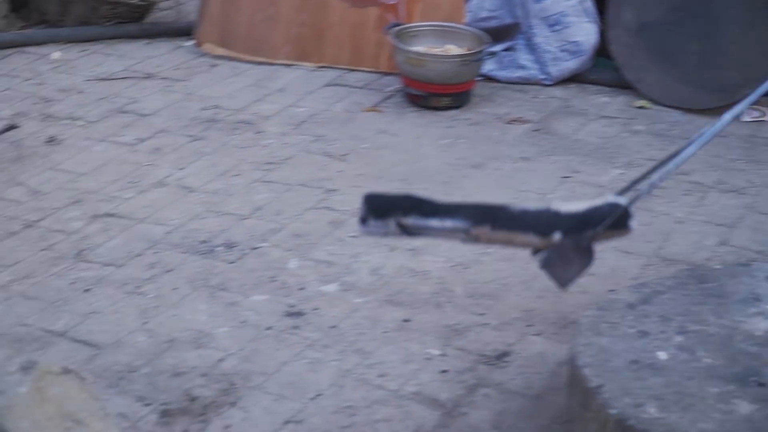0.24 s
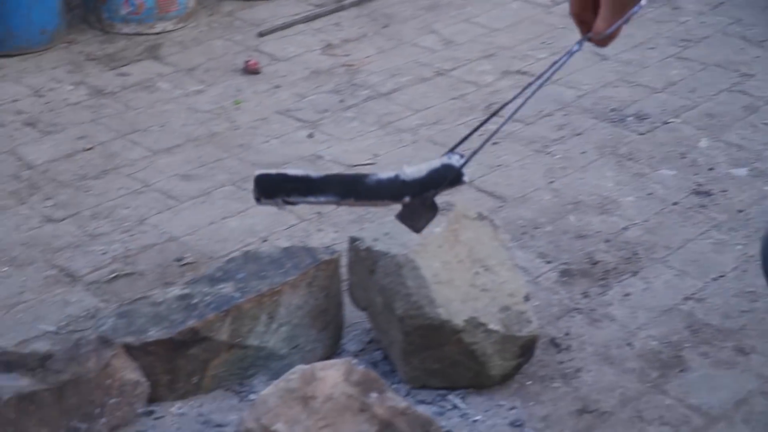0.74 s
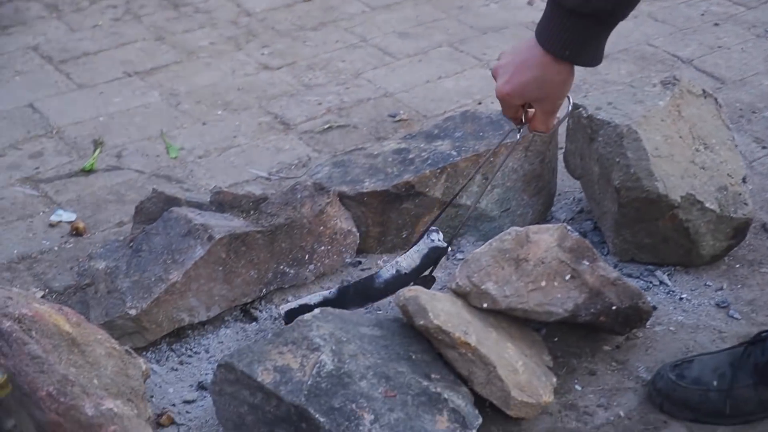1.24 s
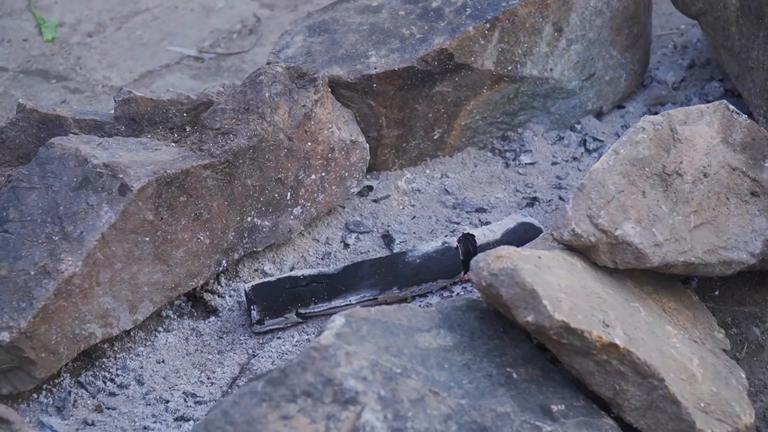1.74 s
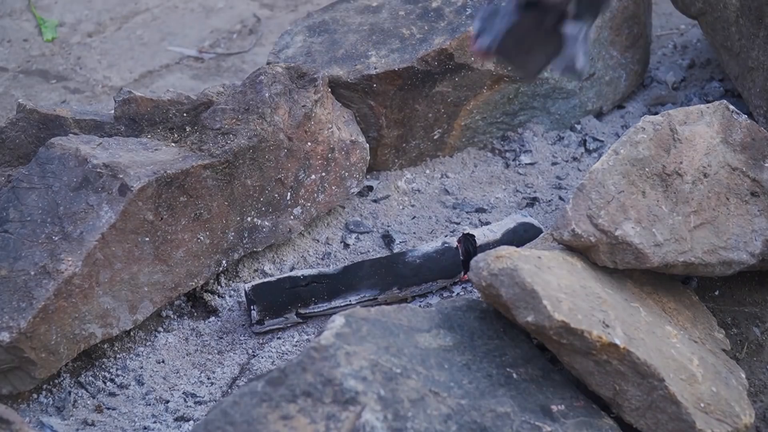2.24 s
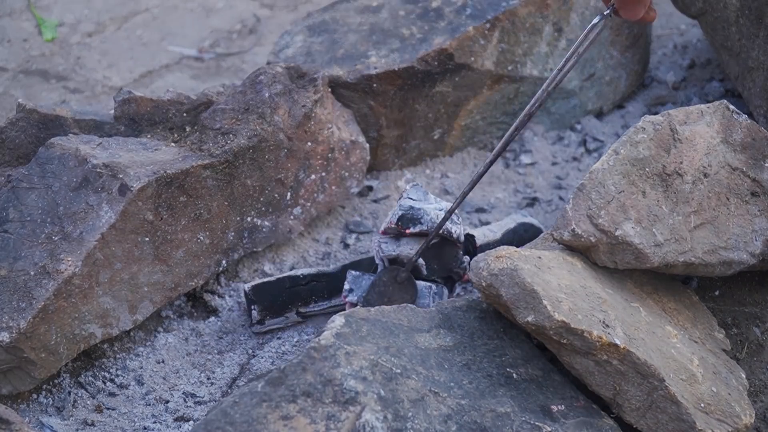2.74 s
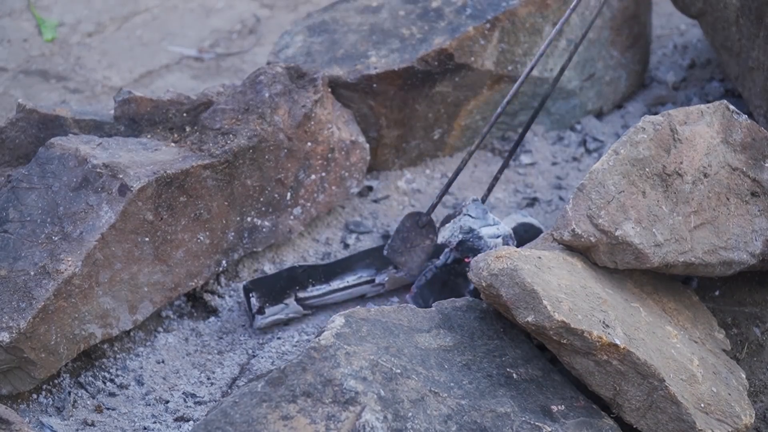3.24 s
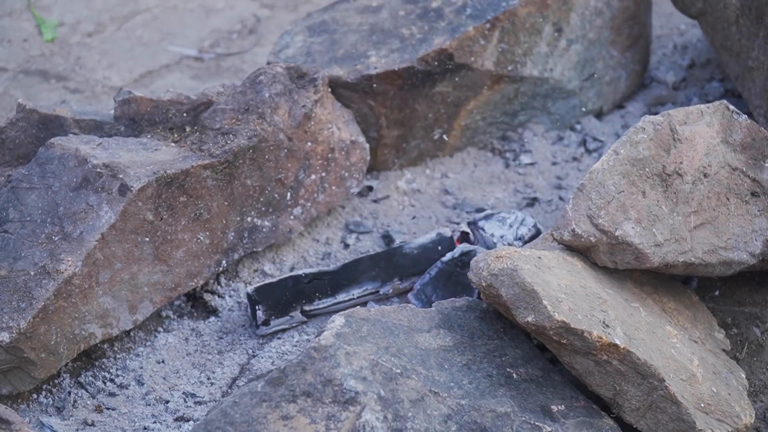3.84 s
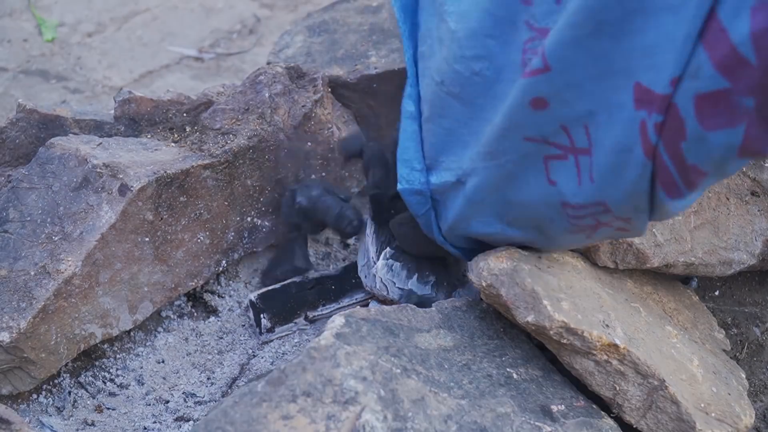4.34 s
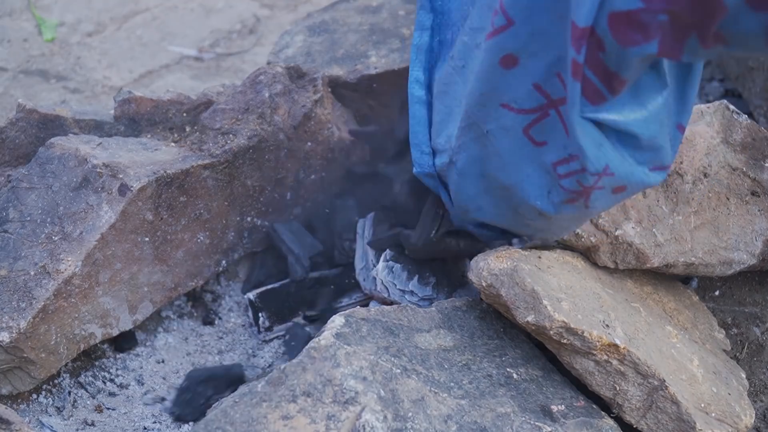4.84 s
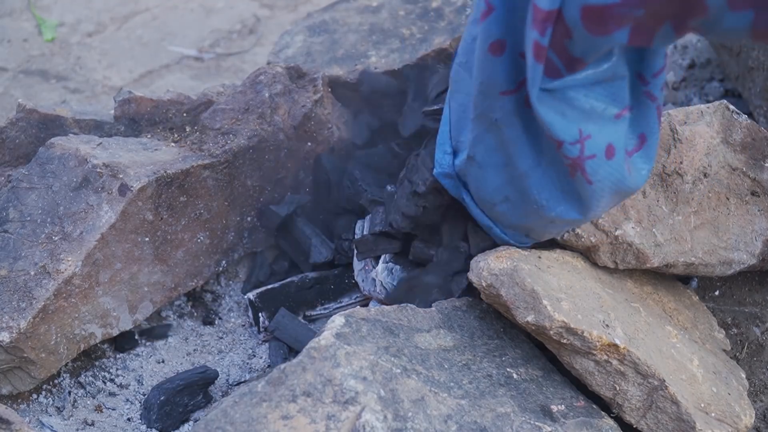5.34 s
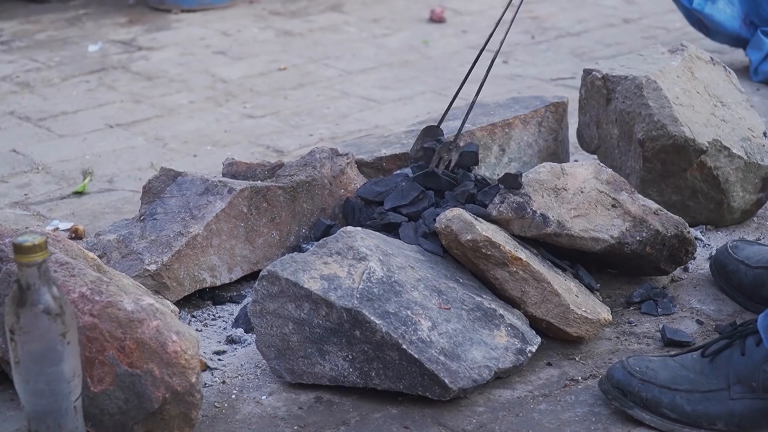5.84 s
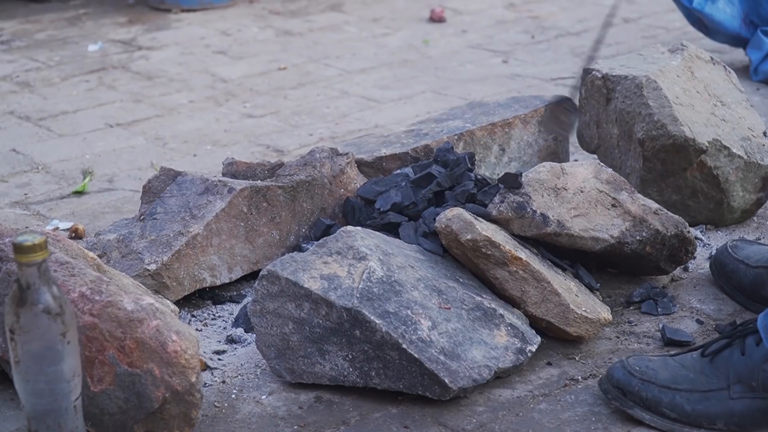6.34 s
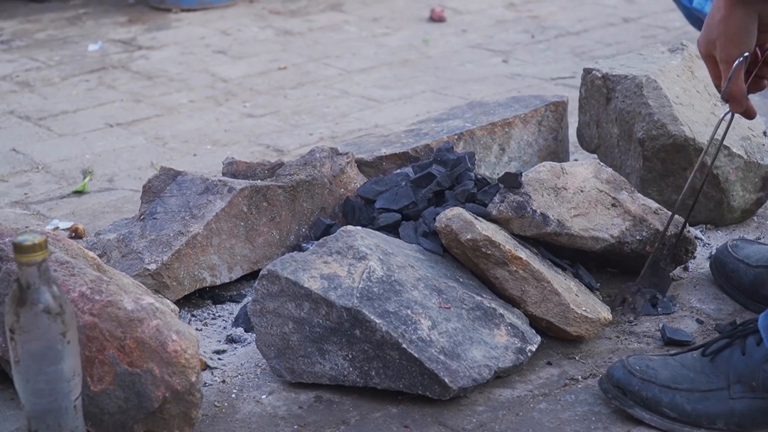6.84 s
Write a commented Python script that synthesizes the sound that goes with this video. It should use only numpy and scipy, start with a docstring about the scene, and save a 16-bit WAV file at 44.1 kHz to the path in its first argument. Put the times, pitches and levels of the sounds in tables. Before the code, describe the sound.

Embers pop and hiss, metal tongs tap, then a sack thumps and charcoal pours in a loud clattering rush that stops dead before quieter poking.

```python
"""A charcoal fire in a ring of stones on a paved yard, close to one microphone, with gusts of wind on it.
At first embers pop (noise bursts through sharp filters) over a faint far whine; tongs tap, the embers hiss.
Then lumps knock (short damped rings), a sack thumps down (dull modes), and charcoal pours out (a hail of hits).
The pour is cut off abruptly, the yard air switches colour and the sizzle drops in level; the tongs stir
the heap (tiny slips), one loud pop goes off, and the tongs tap on stone (contacts that ring the steel modes)."""
import sys
import numpy as np
from scipy import signal
from scipy.fft import rfft, irfft, next_fast_len
from scipy.io import wavfile
from scipy.ndimage import uniform_filter1d, map_coordinates

SR = 44100
rng = np.random.default_rng(int(sys.argv[2]) if len(sys.argv) > 2 else 0)


def digitize_waveform(pressure):
    """Quantize a signal to 16-bit integers and store it at the path in sys.argv[1].

    Rows of a 2-D input are taken as channels; values are limited to [-1, 1].
    """
    field = np.atleast_2d(pressure).T
    bounded = np.clip(field, -1, 1)
    quanta = np.round(bounded * 32767).astype(np.int16)
    wavfile.write(sys.argv[1], SR, quanta)


N = 312669  # about 7.09 s

# All levels are relative: the layers are scaled again where they are mixed.
# Ember pops close to the microphone:
# (time [s], level [dB], brightness [dB per octave], highest pitch [Hz], crumbling t60 [s])
EMBER_POPS = [(0.043, 28.5, -2.5, 650, 0.06), (0.0494, 16.5, -1.5, 4630, 0.068),
              (0.3, 3.5, -2, 4430, 0.038), (0.5735, 5.5, -6, 800, .038), (0.661, 8.5, -6, 12000, 0.17),
              (0.738, 10.5, -2.5, 4500, 0.027), (0.948, 18.5, -5.5, 780, 0.068), (0.957, 6, -2, 8000, 0.11),
              (0.994, 20.5, -3, 2670, 0.02), (1.11, 2.5, -3.5, 9000, 0.33), (1.149, 16, -1.5, 1680, 0.0083),
              (1.166, 3.5, -2, 4480, 0.0096), (1.1963, 9, -4.5, 2500, .058),
              (1.21, 18.5, -4.5, 10900, 0.011), (1.347, -3.5, -.5, 9500, 0.013),
              (1.49, 7.5, -5, 1840, 0.03), (1.556, 4.5, -4.5, 14000, 0.034), (1.597, 5.5, -4, 9000, 0.038),
              (1.887, -1.5, -7.5, 1000, 0.046), (1.9616, 14, -2, 2000, 0.033),
              (1.9669, 15, -5, 1900, 0.017), (2.287, 9.5, -7.5, 990, 0.075), (2.3318, 14, -5.5, 1920, .027),
              (2.4595, -6.5, 0, 14000, 0.035), (3.648, 0.5, 3, 5200, 0.013),
              (6.199, 25.5, -1.5, 3930, 0.012)]
POP_HZ = np.geomspace(200, 16000, 20)  # pitches at which a pop's colour is set
POP_PIVOT_HZ, CLIFF_DB = 780, 17.5  # brightness tilts about this pitch; fall per octave above the highest pitch
BOOM_HZ, BOOM_T60_S, BOOM_DB = 213, 0.088, -54.5  # a low note lingers after each pop, in step with its bass
# scattered tail before and after the cut, when the microphone stands farther off
TAIL_DB, TAIL_LATE_DB = -11.5, -5

# Charcoal lumps knocking together:
# (time [s], level [dB], brightness [dB per octave], ring pitch [Hz], ring level [dB])
LUMP_KNOCKS = [(2.705, -0.5, -2, 7130, -23), (2.792, 0, 1, 3500, -19), (3.0209, 18, -6, 3230, -10),
               (3.037, 1, -5, 3280, -23), (3.0645, 9, -5, 2910, -13.5), (3.4202, 1, -2, 1075, -16.5),
               (3.4695, 0, -0.5, 3060, -35), (3.484, 5, -4.5, 1900, -28), (3.835, 0, -6, 2060, -29),
               (3.9397, 7, -3, 1950, -7), (3.956, 11, 0.5, 1510, -2.5), (4.064, 6, 1.5, 6000, -4),
               (4.125, 15, -2.5, 3000, -12), (4.207, 8, -3, 2750, 2.5), (4.247, 12, 0.5, 8100, -5),
               (4.332, 17.5, 1, 7160, -1.5), (4.349, 19.5, -1.5, 8330, -5), (4.398, 17.5, -3.5, 3080, -5),
               (4.6, 12, 3, 3340, -12), (4.697, -13, 4, 3640, -2.5), (4.824, 8.5, 5.5, 8490, 5),
               (4.857, -6, 2, 4800, -2), (4.929, 18, -1.5, 3080, -15), (5.134, 14.5, 3.5, 3130, -22.5),
               (5.177, 17.5, -0.5, 2580, -10), (5.213, 12.5, 2, 8400, -5), (5.391, 5, -7.5, 2350, -12.5),
               (5.435, 14, 2.5, 6170, -0.5), (5.96, 0.5, 0, 2830, -16), (5.974, -0.5, 1, 4410, -25),
               (6.007, -7, -1, 6500, -29), (6.3046, -5, 1.5, 2740, -23), (6.3535, -11, 2.5, 2620, -24),
               (6.517, 0.5, -1, 2600, -16), (6.6675, 0, -1, 2490, -23), (6.6892, -2, -1, 4500, -33),
               (6.709, -5.5, -1, 8150, -24)]
# Pitches at which the colour of a hard contact is set: (pitch [Hz])
KNOCK_HZ = [480, 1200, 3500, 9500]
# Colour of every lump knock, at each of KNOCK_HZ: (level [dB])
LUMP_BODY_DB = [-5.5, -3, -1, -10.5]
KNOCK_T60_S, RATTLE_T60_S = 0.016, 0.16  # crumbling of a lone knock; of a poured lump rattling down the heap

# The tongs strike stone: (time [s], force [dB], chatter t60 [s], ring level [dB])
TONG_TAPS = [(1.571, 19.5, 0.055, -23.5), (3.302, -7, 0.14, -32), (6.595, 21.5, .024, -17),
             (6.775, 16.5, 0.022, -24.5), (6.797, -7, 0.04, -30), (6.912, -1, 0.042, -30.5),
             (6.9717, 3.5, 0.049, -51), (7.043, -5, .07, -43)]
# Colour of a light tap, at each of KNOCK_HZ: (level [dB])
TAP_BODY_DB = [-1.5, -3, -6, -10]
# Growth there with force, so that hard taps are sharper: (gain [dB per dB of force])
TAP_GROWTH = [0.091, -0.72, 1, 0.52]
# Modes of the steel arms before the grip damps them: (pitch [Hz], level [dB], t60 [s])
STEEL_MODES = [(1320, -13, 0.094), (2580, -23.5, 0.085), (3240, -3.5, .04), (3610, -9, 0.11),
               (3980, 0, 0.029), (4130, -10, 0.23), (4110, -4.5, 0.055), (5170, -14, 0.12),
               (7540, -19.5, .06), (8000, -3, 0.063), (9000, -23, 0.093), (13120, -15, 0.24),
               (14020, -20, 0.13)]

# The pour: (time [s], flow [dB], thud of heavy lumps [dB], fine dust [dB])
POUR_FLOW = [(3.95, -17, -29.5, -22.5), (4.164, -18, -31, -22), (5.128, -18.5, -34, -20.5),
             (5.63, -27.5, -42, -31)]
POUR_START, CUT = 3.939, 5.639  # s
# Colour of the charcoal landing on the heap: (pitch [Hz], level [dB per Hz])
HEAP_COLOUR = [(35, -45), (60, -22), (103, -14.5), (180, -13.5), (293, -7.5), (456, -4.5), (780, 2.5),
               (919, 2.5), (3020, 3.5), (4490, -1), (5280, -9.5), (8420, -12.5), (9240, -22), (13400, -20),
               (15800, -27)]
CLINKS_PER_S, CLINK_T60_S, CLINK_DB = 29, 0.064, -19.5  # single pieces ringing out of the pour
# Pitches at which the poured pieces ring: (pitch [Hz])
PIECES_HZ = [1970, 2698, 3004, 3400, 4355, 5460, 6068, 6610, 6980, 6880, 8580]

# The full sack lands on the stones: (time [s], level [dB])
SACK_BUMPS = [(3.74, -15.5), (3.758, -22), (3.834, -22), (3.88, -33), (3.921, -26)]
# Dull modes of the sack: (pitch [Hz], level [dB], t60 [s])
SACK_MODES = [(95.5, -13.5, 0.47), (157.4, -4.5, 0.22), (320, -13.5, 0.097), (430, -12, 0.053)]

# Lumps and ash shift and scrape, and the sack rustles from 3.62 to 3.70 s: (start [s], end [s], level [dB])
SCRAPES = [(2.795, 2.864, -35.5), (2.94, 3.02, -40.5), (3.246, 3.367, -41), (3.619, 3.702, -36),
           (5.818, 5.869, -51), (5.96, 6.126, -37.5), (6.105, 6.192, -43), (6.394, 6.451, -49),
           (6.59, 6.74, -44.5), (6.78, 6.945, -49.5)]

HISS_START, HISS_END, HISS_ATTACK_S, HISS_RELEASE_S, HISS_DB = 1.95, 2.47, 0.041, 0.11, -40
# Colour of the embers' hiss: (pitch [Hz], level [dB per Hz])
HISS_COLOUR = [(180, -36), (300, -16), (366, -9), (391, -26), (545, -9.5), (1170, -4.5), (2590, -10.5),
               (6240, -11.5), (15800, -19)]

# Gusts on the microphone: (time [s], level [dB])
GUSTS = [(.1, -31.5), (.57, -33.5), (.85, -29.5), (1.6, -30.5), (2.1, -34), (6.17, -41.5), (6.85, -61)]
GUST_WIDTH_S, CALM_DB = 0.16, -50.5
# Rumble of wind on the microphone: (pitch [Hz], level [dB per Hz])
WIND_COLOUR = [(5, -25), (14, -3), (20, 0), (28, -20), (55, -28), (120, -62), (300, -120)]

# Background before the cut: (time [s], yard air [dB], ember sizzle [dB])
AIR = [(0, -43, -47.5), (1.65, -45, -50.5), (1.9, -45.5, -45.5), (2.6, -47, -51), (3.9, -47.5, -47)]
# Background after the cut: (time [s], yard air [dB], ember sizzle [dB])
AIR_LATE = [(5.65, -48.5, -62), (6.1, -49, -56.5), (7.09, -45, -59.5)]
# Colour of the yard air before the cut: (pitch [Hz], level [dB per Hz])
YARD_COLOUR = [(26, -25), (45, -6), (181, -11.5), (494, -12), (594, -14.5), (1050, -16), (1690, -18),
               (1990, -19), (2440, -23), (2930, -25.5), (6000, -28), (7800, -66), (13200, -120)]
# Colour of the yard air after the cut: (pitch [Hz], level [dB per Hz])
YARD_LATE_COLOUR = [(26, -31), (45, -1.5), (85, -11.5), (335, -17), (514, -18), (1190, -24.5), (1400, -22),
                    (1790, -35), (6000, -37.5), (7800, -77.5), (13200, -120)]
# Colour of the fine ember sizzle: (pitch [Hz], level [dB per Hz])
SIZZLE_COLOUR = [(1470, -29.5), (2500, -7), (2600, -23), (2790, -10), (3480, -13), (4320, -18),
                 (4560, -13.5), (5410, -24), (7420, -8.5), (10000, -19), (15800, -22)]

# A faint far whine: (pitch [Hz], level [dB])
WHINE_TONES = [(1710, -6), (2480, -4)]
# The whine swells: (start [s], end [s], level [dB])
WHINE_SWELLS = [(-.1, .15, -44.5), (.35, .55, -43.5), (.59, .66, -41.5)]
WHINE_REST_DB = -55.5

TOP_HZ = 15900  # band limit


def amp(db):
    """Decibels to gain."""
    return 10 ** (np.asarray(db) / 20)


def unit(x):
    """Scale to rms 1."""
    return x / np.sqrt(np.mean(x ** 2) + 1e-20)


def along(points, hz):
    """Read (Hz, value) points on a log axis."""
    f, v = np.transpose(points)
    return np.interp(np.log(hz + 1), np.log(f + 1), v)


def clock():
    """The time of every sample in seconds."""
    return np.arange(N) / SR


def curves(rows):
    """One value per sample for each column after the time."""
    s, *cols = np.transpose(rows)
    return [np.interp(clock(), s, c) for c in cols]


def wobble(rate):
    """A smooth random curve with rate knots a second."""
    knots = rng.standard_normal(int(N * rate / SR) + 4)
    return map_coordinates(knots, [clock() * rate])


def swells(rows):
    """A rounded arch of gain for each (start, end, dB) row."""
    total = 0
    for start, end, db in rows:
        progress = np.clip((clock() - start) / (end - start), 0, 1)
        total = total + amp(db) * np.sqrt(np.abs(np.sin(np.pi * progress)))
    return total


def filtered(x, response):
    """Apply a response of frequency to x."""
    m = next_fast_len(N + SR // 2)
    return irfft(rfft(x, m) * response(np.fft.rfftfreq(m, 1 / SR)), m)[:N]


def coloured(x, spectrum):
    """Shape x by (Hz, dB) points, at rms 1."""
    return unit(filtered(x, lambda hz: amp(along(spectrum, hz))))


def add(track, s, sound):
    """Mix a sound into the track at time s."""
    part = track[round(s * SR):][:len(sound)]
    part += sound[:len(part)]


def causal(spectrum, size=2048):
    """The sharpest (minimum-phase) impulse response with this (Hz, dB) spectrum."""
    cepstrum = irfft(np.log(amp(along(spectrum, np.fft.rfftfreq(size, 1 / SR)))))
    # fold the cepstrum onto positive time
    cepstrum[1:size // 2] *= 2
    cepstrum[size // 2 + 1:] = 0
    return irfft(np.exp(rfft(cepstrum)))


def dying_noise(t, t60):
    """A decaying puff of noise of unit energy."""
    puff = rng.standard_normal(len(t)) * amp(-60 * t / t60)
    return puff / np.linalg.norm(puff)


def ringing(t, hz, t60):
    """One damped mode."""
    return np.sin(2 * np.pi * hz * t) * amp(-60 * t / t60)


def fracture(t, t60, snap):
    """A blow: a clean snap (its share of the energy 0-1), then crumbling."""
    snap = np.clip(snap, 0, 1)
    blow = np.sqrt(1 - snap) * dying_noise(t, t60)
    blow[0] += np.sqrt(snap)
    return blow


def grit(rate, spread_db):
    """Sparse ticks of very unequal size, rate a second on average, at rms 1."""
    sizes = amp(spread_db * np.minimum(rng.exponential(size=N), 3))
    return unit((rng.random(N) < rate / SR) * rng.choice([-1, 1], N) * sizes)


def knock(t, levels, t60, snap, ring_share, count=14):
    """The dry contact of two hard things, with a few short chance resonances."""
    bass = [(70, levels[0] - 23.0), (250, levels[0] - 7.5)]
    body = causal([*bass, *zip(KNOCK_HZ, levels), (16000, levels[-1] - 3.5)])
    hz = rng.uniform(700, 15500, (count, 1))
    ring = ringing(t, hz, 0.037).sum(0)
    ring_share = np.clip(ring_share, .15, .5)
    dry_blow = np.sqrt(1 - ring_share) * fracture(t, t60, snap)
    blow = dry_blow + np.sqrt(ring_share) * ring / np.linalg.norm(ring)
    return signal.fftconvolve(blow, body)


def collisions(first, last, size_db, crunch_t60, ring_t60, ring_db, count, order=4):
    """A hail of lumps between two times: each one crunches and rings with a few modes of its own."""
    draws = rng.random((count, 2 + 2 * order))
    # evenly spaced hits, each up to four spacings early
    slots = np.arange(count) + 4 * draws[:, 0] - 4
    start = ((first + (last - first) * slots / count) * SR).astype(int)
    size = amp(size_db * np.minimum(-np.log(draws[:, 1]), 3))
    t = np.arange(SR // 28) / SR
    # crunch: noise that follows the summed, decaying energy of the hits
    energy = signal.fftconvolve(np.bincount(start, size ** 2, N), amp(-60 * t / crunch_t60) ** 2)[:N]
    crunch = np.sqrt(np.abs(energy)) * rng.standard_normal(N)
    # ring: random modes between 700 and 14000 Hz, stronger when higher
    hz = 700 * 20 ** draws[:, 2:2 + order].reshape(-1, 1)
    chance = np.sqrt(-np.log(draws[:, 2 + order:])).reshape(-1, 1)
    strength = chance * np.repeat(size, order)[:, None]
    modes = strength * np.sqrt(hz) * ringing(t, hz, ring_t60)
    where = np.repeat(start, order)[:, None] + np.arange(len(t))
    ring = np.bincount(where.ravel(), modes.ravel(), N)[:N]
    return unit(crunch) + amp(ring_db) * unit(ring)


def pops():
    """Embers burst close by, some dull and some sharp; stones and walls scatter a tail back."""
    out, tails, t = np.zeros(N), np.zeros(N), np.arange(SR // 2) / SR
    for s, db, bright_db, top_hz, t60 in EMBER_POPS:
        tilt = bright_db * np.log2(POP_HZ / POP_PIVOT_HZ)
        cliff = CLIFF_DB * np.maximum(np.log2(POP_HZ / top_hz), 0)
        levels = db + tilt - cliff
        bass = [(30, levels[0] - 28), (95, levels[0] - 10)]
        body = causal([*bass, *zip(POP_HZ, levels)])
        add(out, s, signal.fftconvolve(fracture(t, t60, snap=0.35), body))
        add(out, s, amp(levels[0] + BOOM_DB) * ringing(t, BOOM_HZ, BOOM_T60_S))
        scatter = dying_noise(t, 0.29) * (1 - np.exp(-t / 0.0017))
        tail_db = TAIL_DB if s < CUT else TAIL_LATE_DB
        add(tails, s, amp(tail_db) * signal.fftconvolve(scatter, body))
    tail_colour = [(70, -41), (180, 2.0), (1000, 2), (4000, -2), (12000, 8.5)]
    return out + filtered(tails, lambda hz: amp(along(tail_colour, hz)))


def pour():
    """Charcoal slides out of the sack: thudding lumps, a clinking body and hissing dust."""
    running = (clock() > POUR_START) & (clock() < CUT)
    hail = collisions(POUR_START, CUT, size_db=4.6, crunch_t60=.036, ring_t60=.04, ring_db=-4.5, count=660)
    # the flow sets the overall level, single collisions stand out of it
    hail = running * hail / np.sqrt(np.abs(uniform_filter1d(hail ** 2, size=SR // 12)) + 1e-6)
    hail = hail + running * amp(CLINK_DB) * clinks()
    # splinters snap off as the lumps land
    splinters = running * amp(-8.0) * grit(rate=390, spread_db=-6.0)
    hail = coloured(hail + splinters, HEAP_COLOUR)
    flow_db, thud_db, dust_db = curves(POUR_FLOW)

    def above(hz, edge):
        """A steep high-pass response."""
        return 1 - 1 / (1 + (hz / edge) ** 8)

    thud = filtered(hail, lambda hz: 1 - above(hz, 500))
    dust = filtered(hail, lambda hz: above(hz, 6000))
    layers = [(hail - thud - dust, flow_db - 1.27), (thud, thud_db - .8), (dust, dust_db - 3.0)]
    # each size of lump tumbles out in its own small surges
    return running * sum(amp(db + wobble(16)) * x / x[running].std() for x, db in layers)


def clinks():
    """Poured pieces strike at random times, each ringing at one of the set pitches."""
    out, t = np.zeros(N), np.arange(SR // 8) / SR
    duration = CUT - POUR_START
    draws = rng.random((int(CLINKS_PER_S * duration), 2))
    for k, (when, size) in enumerate(draws):
        hz = PIECES_HZ[k % len(PIECES_HZ)]
        add(out, POUR_START + when * duration, size * ringing(t, hz, CLINK_T60_S))
    return unit(out)


def lumps():
    """Charcoal is brittle and glassy: each knock rings briefly at the lump's own pitch."""
    out, t = np.zeros(N), np.arange(SR // 5) / SR
    octaves = np.log2(np.array(KNOCK_HZ) / 2000)
    for s, db, bright_db, hz, ring_db in LUMP_KNOCKS:
        levels = db + np.array(LUMP_BODY_DB) + bright_db * octaves
        t60 = RATTLE_T60_S if POUR_START - .01 < s < CUT else KNOCK_T60_S
        add(out, s, knock(t, levels, t60, snap=.12, ring_share=.35))
        add(out, s, amp(ring_db - 8.0) * ringing(t, hz, 0.037))
    return out


def tongs():
    """Every tap chatters for a moment and so rings the steel arms at new strengths; the grip damps them."""
    out, t = np.zeros(N), np.arange(SR // 3) / SR
    grip = amp(-60 * t / .3)
    for s, force_db, t60, ring_db in TONG_TAPS:
        levels = np.array(TAP_BODY_DB) + force_db * np.array(TAP_GROWTH)
        add(out, s, amp(-3.5) * knock(t, levels, t60, snap=0.09, ring_share=0.3))
        # each tap detunes the modes slightly
        ring = sum(amp(db) * ringing(t, hz * rng.normal(1, 0.015), life) for hz, db, life in STEEL_MODES)
        chatter = fracture(t, t60, snap=0.2)
        add(out, s, amp(ring_db) * signal.fftconvolve(chatter, ring * grip))
    return out


def sack():
    """The heavy sack thumps down on its dull modes and settles, with a puff of cloth."""
    out, t = np.zeros(N), np.arange(SR // 3) / SR
    cloth = causal([(40, 20), (150, 40), (500, 30.5), (1200, 21), (5000, -1.5)])
    for s, db in SACK_BUMPS:
        thump = sum(amp(level) * ringing(t, hz, t60) for hz, level, t60 in SACK_MODES)
        thump = thump * (1 - np.exp(-t / 0.00097))  # soft onset
        puff = signal.fftconvolve(dying_noise(t, 0.48), cloth)[:len(t)]
        add(out, s, amp(db) * (thump + puff))
    return out


def scrapes():
    """Tiny slips make small lumps tinkle and keep the steel faintly ringing."""
    t = np.arange(SR // 8) / SR
    slips = unit(collisions(2.7, 7.0, size_db=3.5, crunch_t60=.02, ring_t60=.06, ring_db=3, count=1200))
    # the modes are evened out and die twice as fast as their listed t60
    steel = sum(amp(db * 0.48) * ringing(t, hz, life / 2) for hz, db, life in STEEL_MODES)
    sing = amp(-8) * unit(signal.fftconvolve(slips, steel)[:N])
    tinkle = coloured(slips, [(300, -5.5), (1500, -7), (3700, -7.0), (7500, -4), (9500, -12.0), (15000, -2.5)])
    return amp(-4) * swells(SCRAPES) * (tinkle + sing)


def hiss():
    """A brief hiss of the embers (noise with dense ticks) that gathers into a sharper band before it stops."""
    broad = rng.standard_normal(N) + amp(-13) * grit(rate=3500, spread_db=-14.0)
    focus = np.interp(clock(), [2.05, 2.3], [0, .85])
    band = coloured(rng.standard_normal(N), [(3000, -22), (5000, 2.0), (6400, 6), (7600, 0), (10000, -41)])
    rise = (clock() - HISS_START) / HISS_ATTACK_S
    fall = (HISS_END - clock()) / HISS_RELEASE_S
    envelope = np.clip(np.minimum(rise, fall), 0, 1)
    return amp(HISS_DB) * envelope * (coloured(broad, HISS_COLOUR) + focus * band)


def wind():
    """Slow gusts push on the microphone over a light breeze: low noise under bell-shaped swells."""
    gusts = sum(amp(db) * np.exp(-.5 * ((clock() - s) / GUST_WIDTH_S) ** 2) for s, db in GUSTS)
    return (amp(CALM_DB) + gusts) * coloured(rng.standard_normal(N), WIND_COLOUR)


def background(rows, yard_spectrum):
    """The murmur of air in the yard (noise) and the fine sizzle of the embers (noise with ticks)."""
    yard_db, sizzle_db = curves(rows)
    yard = amp(yard_db + 0.27 * wobble(8.5)) * coloured(rng.standard_normal(N), yard_spectrum)
    sizzle = coloured(rng.standard_normal(N) + amp(-6.0) * grit(rate=23, spread_db=1.0), SIZZLE_COLOUR)
    return yard + amp(sizzle_db) * sizzle


def whine():
    """Two faint far tones, wavering in pitch and level."""
    tones = 0
    for hz, db in WHINE_TONES:
        level = amp(db + 2.6 * wobble(3.7))
        phase = 2 * np.pi * np.cumsum(hz + 9 * wobble(50)) / SR
        tones = tones + level * np.sin(phase)
    return (amp(WHINE_REST_DB) + swells(WHINE_SWELLS)) * tones


def scene():
    """All sources at the one microphone; the background switches at the cut."""
    close = pops() + lumps() + tongs() + scrapes() + sack() + pour() + wind()
    early = background(AIR, YARD_COLOUR) + hiss() + whine()
    late = background(AIR_LATE, YARD_LATE_COLOUR)
    return (close + np.where(clock() < CUT, early, late))[None]


def record(dry):
    """Peaks round off at full scale; nothing is kept above the band limit."""
    held = dry[0] / (1 + np.abs(dry[0]) ** 6) ** (1 / 6)
    return filtered(held, lambda hz: hz < TOP_HZ)[None]


dry = scene()
out = record(dry)
digitize_waveform(out)
```